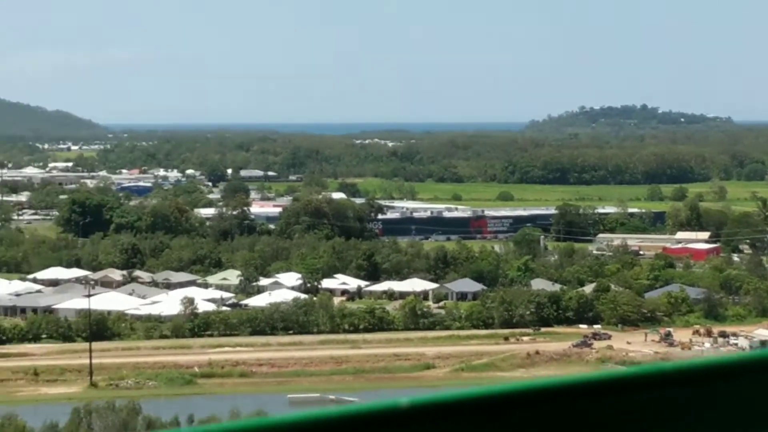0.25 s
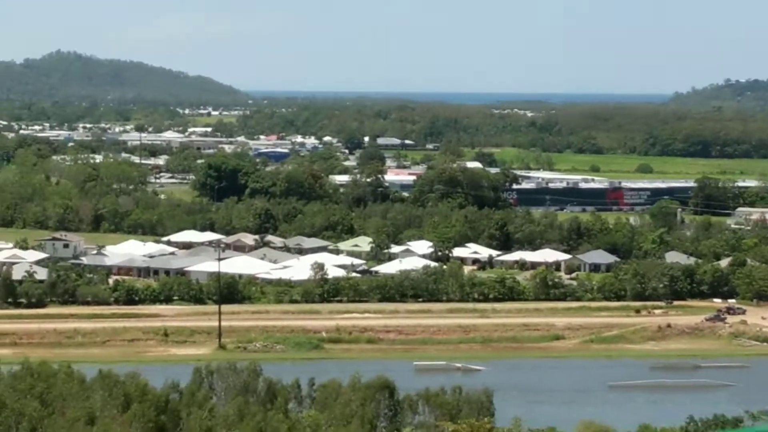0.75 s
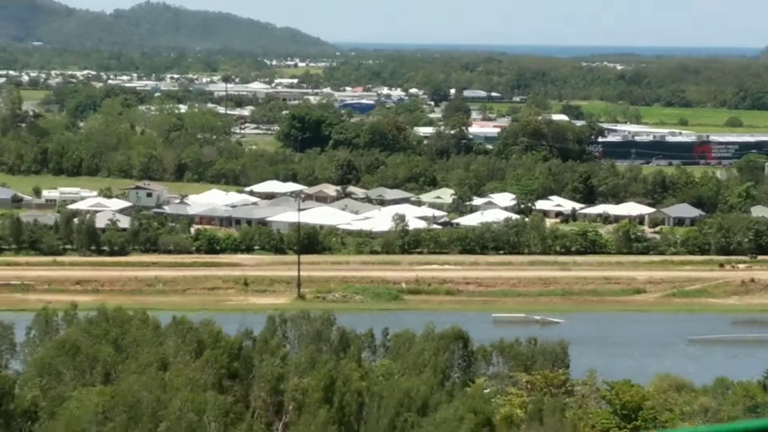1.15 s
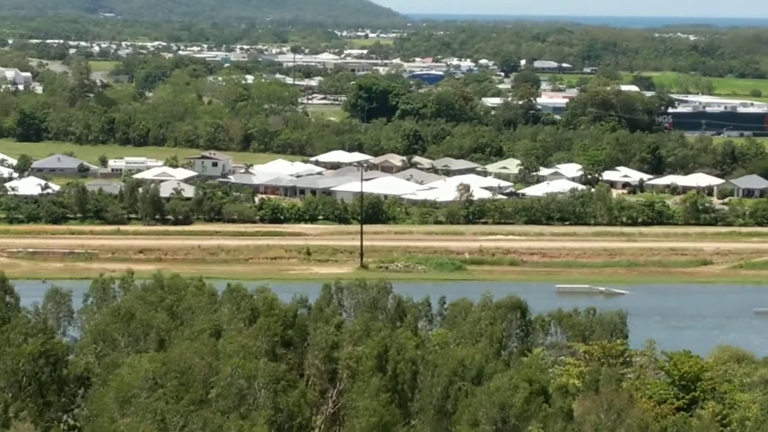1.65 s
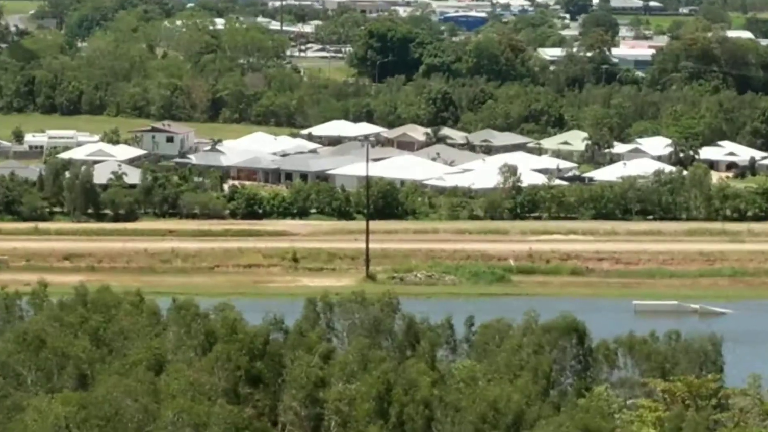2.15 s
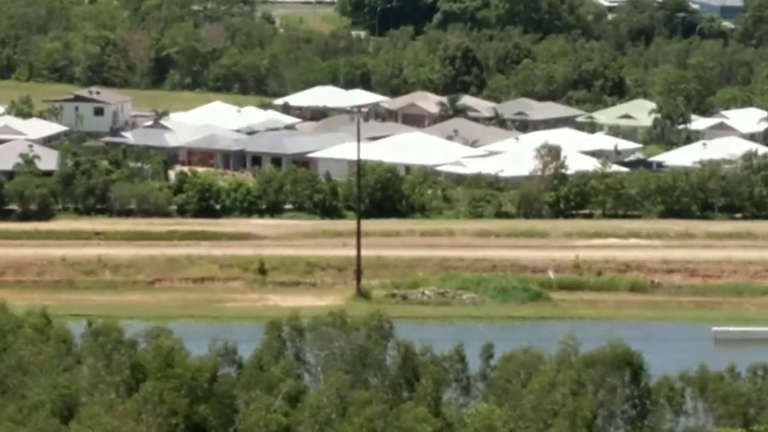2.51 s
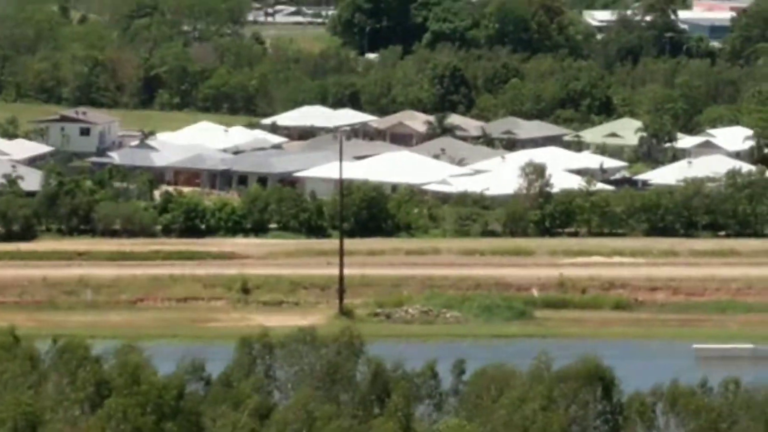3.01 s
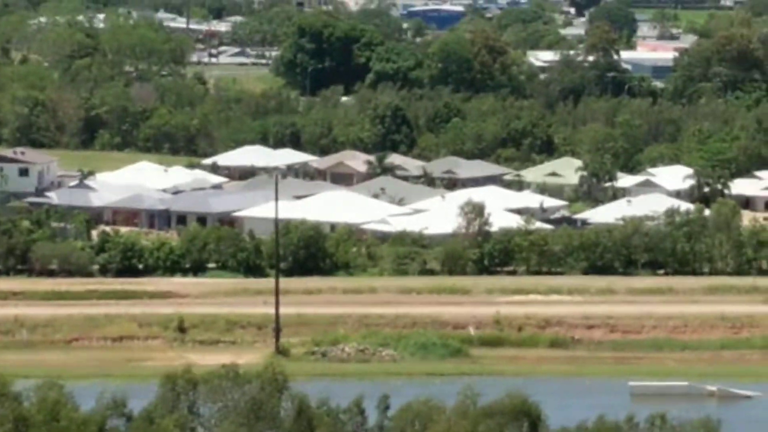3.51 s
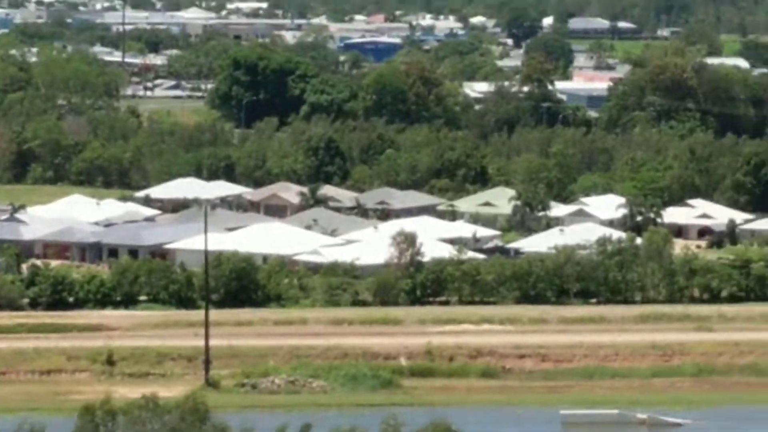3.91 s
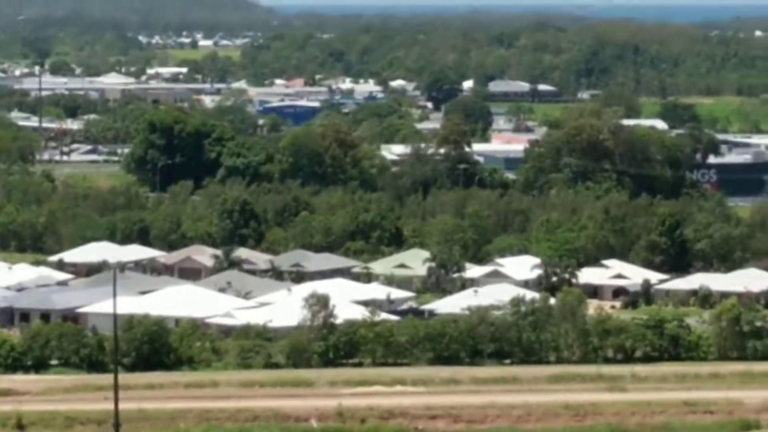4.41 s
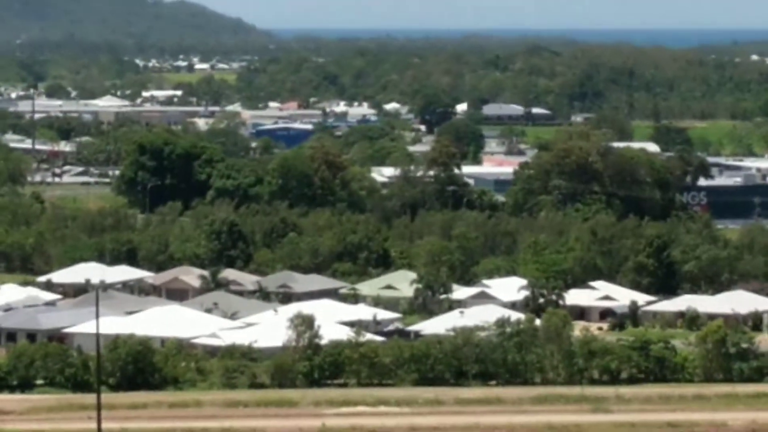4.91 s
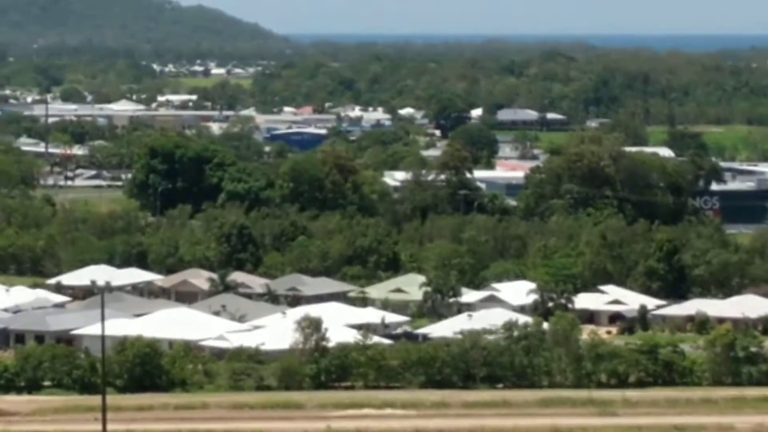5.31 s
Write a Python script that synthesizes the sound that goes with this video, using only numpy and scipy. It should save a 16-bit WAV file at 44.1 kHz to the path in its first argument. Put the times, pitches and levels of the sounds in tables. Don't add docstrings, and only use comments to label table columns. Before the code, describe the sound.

Inside a gondola cabin, a low boomy rumble continues while a loose window pane ticks, then bursts into a hard clatter at a jolt.

```python
import sys
import numpy as np
from scipy import signal
from scipy.fft import rfft, irfft
from scipy.io import wavfile
from scipy.ndimage import uniform_filter1d

SR = 44100
rng = np.random.default_rng(int(sys.argv[2]) if len(sys.argv) > 2 else 0)


def volts(x):
    e = np.asarray(x, float) / 20
    return 10 ** e


def wrap_up_sound(samples):
    columns = np.atleast_2d(samples).T
    tamed = np.clip(columns, -1, 1)
    steps = np.round(tamed * 32767).astype(np.int16)
    wavfile.write(sys.argv[1], SR, steps)


N = 244755
TIME_S = np.arange(N) / SR


def noise():
    return rng.standard_normal(N)


def level(x, db):
    return x * volts(db) / np.sqrt(np.mean(x ** 2))


def curve(points):
    return np.interp(TIME_S, *np.transpose(points))


def bump(s, half_s):
    return np.clip(1 - np.abs(TIME_S - s) / half_s, 0, 1)


def walk(rate_hz):
    hold = int(SR / rate_hz)
    x = np.repeat(rng.standard_normal(N // hold + 1), hold)
    x = uniform_filter1d(uniform_filter1d(x, hold), hold)[:N]
    return x / x.std()


def colour(x, spectrum):
    hz, db = np.transpose(spectrum)
    grid_hz = np.linspace(1, SR / 2, 4097)
    log_gain = np.interp(np.log(grid_hz), np.log(hz), db) * np.log(10) / 20
    cepstrum = irfft(log_gain)
    cepstrum[1:4096] *= 2
    cepstrum[4097:] = 0
    response = irfft(np.exp(rfft(cepstrum)))
    return signal.fftconvolve(x, response)[:N]


def resonate(x, hz, width_hz):
    b, a = signal.iirpeak(hz, hz / width_hz, fs=SR)
    return signal.lfilter(b, a, x) * np.sqrt(SR / width_hz / np.pi)


def body(x, modes):
    out = np.zeros(N)
    for k, (hz, width_hz, db) in enumerate(modes):
        out += (-1) ** k * volts(db) * resonate(x, hz, width_hz)
    return out


def steady(x, share):
    envelope = np.sqrt(uniform_filter1d(x ** 2, size=1200))
    return level(x / (envelope + 0.9 * x.std()) ** share, 0)


def train(s, db):
    x = np.zeros(N)
    np.add.at(x, np.minimum((s * SR).astype(int), N - 1), volts(db))
    return x


def fade(x, t60_s):
    return signal.lfilter([1], [1, -1000 ** (-1 / (t60_s * SR))], x)


def swells(hz):
    # time in s, mode in Hz, rise and fall in s, level in dB.
    mode_swells = [(.15, 52, 0.12, 11), (0.97, 52, .1, 3), (2.06, 52, .12, 4), (2.5, 52, 0.16, 23.5),
                   (2.82, 52, 0.15, 15), (3.12, 52, 0.21, 14.5), (3.64, 52, 0.19, 16.5), (4.08, 52, .1, 1),
                   (4.56, 52, .11, 17), (4.75, 52, 0.11, 17.5), (1.16, 79, 0.039, -5),
                   (2.22, 79, 0.13, 4.5), (2.68, 79, 0.095, 1), (3.83, 79, 0.15, -4),
                   (4.06, 79, 0.11, 11.5), (4.58, 79, 0.082, 9.5), (5.38, 79, 0.19, -0.5),
                   (1.22, 140, 0.16, -10), (3.23, 140, 0.077, -28), (3.852, 140, 0.12, 12.5),
                   (4.08, 140, 0.059, -13), (1.62, 244, 0.28, 3.5), (4.55, 140, .07, 10.5),
                   (0.91, 244, 0.14, 6.5), (2.06, 244, 0.13, 2.5), (2.16, 244, 0.058, -18),
                   (2.54, 244, 0.15, 13.5), (3.52, 244, 0.25, 7), (4.07, 244, 0.063, -26.5),
                   (4.65, 244, 0.38, 4.5), (0.42, 244, 0.092, -9), (5.1, 244, .08, -12),
                   (5.1, 140, .12, 9.5), (3.55, 79, 0.044, -13), (0.16, 79, 0.093, 3.5),
                   (0.455, 79, 0.13, 4.5), (1.3, 79, 0.098, 3.5), (2.8, 79, 0.057, 5.5), (1.1, 347, .1, 6),
                   (2.65, 347, 0.053, 8), (4.3, 347, 0.086, 9), (4.35, 347, 0.074, 8), (5.3, 347, 0.098, 7),
                   (3.67, 196, 0.063, 3), (.2, 456, .12, 8), (0.72, 602, .2, 6.5)]
    out_db = np.zeros(N)
    for s, mode_hz, half_s, db in mode_swells:
        if abs(mode_hz / hz - 1) < .1:
            out_db += db * bump(s, half_s)
    return out_db


def cabin():
    # time in s, level in dB against the calm ride.
    shaking = [(0.0, -3), (.3, -1), (1.3, -1), (2.1, 0), (2.5, 0), (2.78, 6.5), (2.95, -1), (3.05, 4),
               (3.5, 1), (4.3, -2), (4.6, 0), (5.0, -2.5), (5.55, -0.5)]
    # frequency in Hz, width in Hz.
    boom_modes = [(52, 14), (79, 17.6), (140, 15.3), (244, 5.86)]
    calm_levels_db = [-50.5, -36, -38.5, -43]
    shake_follow = [1.95, 0.9, 1.16, 1.05]
    # frequency in Hz, width in Hz, level in dB.
    panel_modes = [(194.8, 22.8, -43.5), (302.3, 38, -52), (347.4, 17.6, -50), (459, 33, -63.5),
                   (597, 15, -64)]
    # frequency in Hz, density in dB per Hz.
    wall_spectrum = [(25, -50), (50, 1.5), (100, 0.5), (270, -5.5), (400, -19), (800, -21.5), (1400, -38),
                     (3000, -52)]
    shake_db = curve(shaking)
    booms = np.zeros(N)
    for (hz, width_hz), calm_db, follow in zip(boom_modes, calm_levels_db, shake_follow):
        once = resonate(noise(), hz, 1.26 * width_hz)
        boom = steady(resonate(once, hz, 1.26 * width_hz), share=0.36)
        booms += volts(calm_db + follow * shake_db + swells(hz)) * boom
    panels = np.zeros(N)
    for hz, width_hz, db in panel_modes:
        panels += volts(db + swells(hz) + 1.4 * walk(3.31)) * resonate(noise(), hz, width_hz)
    walls = level(colour(noise(), wall_spectrum), -39)
    return booms + (panels + walls) * volts(0.71 * shake_db + 1.2 * walk(9))


def strikes():
    # time in s, peak in dB, then frame knock, brightness, tail in dB re peak.
    clatter = [(2.5138, -26, 3, -13, 1.5), (2.538, -26, 3, -25, -3), (2.574, -22.5, -6, -11, -7.5),
               (2.6128, -15.5, -11.5, -18, -13.5), (2.6165, -19, -14, -21, -14), (2.648, -41, 0, -14, -17),
               (2.676, -35, 9, -22, -6), (2.704, -22.5, -2, -31, -6), (2.73, -20.5, -11, -14, -13),
               (2.7558, -20, -14, -12, -12), (2.7759, -15, -13, -10.5, -8.5), (2.8086, -20, -5, -12, -5),
               (2.8165, -20, -16, -12, -10.5), (2.8544, -17.5, -15, -11, -14),
               (2.8951, -22, -11, -11.5, -10), (2.929, -34, -18, -16, -10), (2.965, -40, -25, -7, -3.5),
               (3.0514, -22.5, -8, -13, -10), (3.092, -16.5, -8.5, -11, -8.5),
               (3.129, -20.5, -7, -18, -10.5), (3.1325, -22, -12, -18, -13)]
    # time in s, peak in dB, frame knock and
    # tail in dB re peak, extra glass ring in dB.
    taps = [(0.07, -48, 5, -9, -1), (0.1346, -43, -11, -8, -2), (.6824, -44.5, 5.5, -7, -7),
            (0.9237, -36, -2.5, 0, -5), (1.1743, -47.5, 9.5, -9, -6), (1.265, -65, 6, -3, -1),
            (1.52, -48, 17, -0.5, -3), (1.5847, -45, 5, -8, -3), (1.8384, -37.5, 0.5, -7, 3.5),
            (1.8881, -33.5, -4, -11, -11), (2.162, -49, -5, -12, 2), (2.4753, -41, 0, 3.5, -9),
            (3.199, -55, 14, -21, -4), (3.727, -39.5, -4, -7, 2.5), (3.774, -46, 1, -12, -2),
            (4.226, -41.5, -16, -1, -19), (4.5114, -34.5, -2.5, -8, -16), (4.556, -37.5, 5.5, 3.5, -6),
            (4.63, -39, -21, -7, 0), (4.8087, -35.5, 4, -3.5, -3), (4.6545, -38, -16, -9, 1.5),
            (4.7258, -40, -12, -10, -4), (4.773, -43, -17, -5, -4), (5.003, -47, -12, -9, -9),
            (5.257, -51, -12, -12, 0), (2.652, -47, -9, -18, 5), (4.9251, -56, -10, -12, 2),
            (4.9438, -45, -12, -11, -1), (2.757, -52, -9, -15, 7), (2.799, -36, -7, -15, 10),
            (2.856, -40, -7, -15, 12), (2.896, -45, -9, -15, 8), (4.8806, -37, -3, -5.5, 1),
            (5.317, -45, -11, -5, 0), (5.447, -32, -13, -1, 2), (5.489, -52, -9, -18, 7)]
    # time in s, peak in dB, extra glass ring in dB.
    ticks = [(0.1191, -46, -3), (0.2189, -47, -4), (0.2838, -46, -4), (0.3202, -45, 0), (0.3561, -43, 1),
             (0.3815, -43, 3), (0.4693, -35, -0.5), (0.4978, -46, 3), (0.5314, -51, -2), (0.7447, -50, -4),
             (0.8739, -53, -6), (1.0236, -45, 0), (1.0595, -44, -2), (1.1348, -55, -8), (1.3374, -42.5, 0),
             (1.3753, -37, 1), (1.4247, -42, -1), (1.4636, -50, 0.5), (1.6382, -54, -6), (1.6776, -45, 1),
             (1.7055, -51, -1), (1.7394, -41, 4), (1.7799, -41, 3), (1.9265, -48, 2), (1.952, -48, -1),
             (1.9889, -38, 3), (2.0198, -52, 0), (2.0722, -50, -2), (2.3256, -48, 0), (2.3535, -35.5, 3.5),
             (2.3885, -39, 2), (3.25, -41, 2), (3.2869, -42, 2), (3.3209, -45, -1), (3.3563, -35.5, -2.5),
             (3.4042, -38, 4), (3.4401, -35, 3), (3.4775, -40, 3.5), (3.5044, -45, 1), (3.5718, -48, -2),
             (3.6057, -41, 1), (3.6446, -44, 5), (3.8357, -40.5, 0), (3.8831, -39, 1), (3.9205, -44, 4),
             (3.9624, -40, 8), (3.9923, -35, 4), (4.0307, -36.5, 6), (4.0766, -37, 0), (4.2408, -35, 0),
             (4.3041, -35.5, -1), (4.3794, -38, -2), (4.4179, -37.5, -5), (5.0684, -49, -0.5),
             (5.1048, -42, 2), (5.1417, -39, -3), (5.1806, -34, -2), (5.2175, -47, -5), (5.3797, -38.5, 1),
             (5.4191, -44, -4)]
    soft_bright_db, tick_tail_db, tick_db, clatter_ring_db = -22, -6.5, -2.5, 4
    settles_s, run_knock_db, settled_knock_db = 3.35, -4, -21.5
    rows = [(*row, clatter_ring_db) for row in clatter]
    for s, db, knock_db, tail_db, ring_db in taps:
        rows.append((s, db, knock_db, soft_bright_db, tail_db, ring_db))
    for s, db, ring_db in ticks:
        knock_db = run_knock_db if s < settles_s else settled_knock_db
        rows.append((s, db + tick_db, knock_db, soft_bright_db, tick_tail_db, ring_db))
    return np.transpose(rows)


def rattle():
    # frequency in Hz, density in dB per Hz.
    crack_spectrum = [(590, -31.5), (1000, 0.5), (1290, -8.5), (1470, -4), (2010, 0), (2640, -3.5),
                      (7720, -8.5), (9500, -49), (12400, -32), (20900, -120)]
    # frequency in Hz, width in Hz, level in dB.
    pane_modes = [(2420, 54, -10), (2910, 33, -18), (3500, 13, 12), (3900, 29, -6), (4500, 33, 5.5),
                  (5000, 28, 2), (5640, 170, 10), (6240, 37, -13), (6930, 29, 13.5), (7595, 540, 20),
                  (8350, 300, 4)]
    # frequency in Hz, width in Hz, level in dB.
    frame_modes = [(345, 24, -7), (456, 13, -3), (573, 61, 0.5), (718, 81, -3), (852, 47, -6),
                   (990, 37, -10), (1252, 81, -5.5)]
    # time in s, peak in dB.
    edge_raps = [(1.525, -20.5), (2.516, -24), (2.54, -19), (2.58, -20), (2.614, -22), (2.706, -20),
                 (2.772, -22), (2.809, -12.5), (2.816, -24), (3.092, -18), (3.13, -15), (4.557, -31),
                 (4.816, -35)]
    s, peak_db, knock_db, bright_db, tail_db, _ = strikes()

    def chatter(db, t60_s):
        hits = train(s, db)
        return fade(hits, t60_s) - fade(hits, 0.0086)

    touch = train(s, peak_db)
    blow = touch + train(np.maximum(s - .004, 0), peak_db - 5.5)
    crack = volts(3) * fade(blow, .007) * noise() + volts(7) * blow
    crack += chatter(peak_db + tail_db, 0.18) * noise() * volts(2.8 * walk(400))
    crack += volts(-4) * fade(touch, 0.017) * noise() * volts(2.8 * walk(900))

    unit = noise()
    contact = colour(crack, crack_spectrum) / colour(unit, crack_spectrum).std() * volts(-10.5)
    pane = body(crack, pane_modes) / body(unit, pane_modes).std() * volts(-18.5)

    knock = chatter(peak_db + knock_db, 0.15) * noise()
    knock += volts(17.5) * train(*np.transpose(edge_raps))
    frame = volts(-10.0) * body(knock, frame_modes)

    top_db = peak_db + bright_db
    top = (fade(train(s, top_db), 0.0088) + volts(-4.0) * chatter(top_db, 0.12)) * noise()
    top = volts(3.0) * colour(top, [(5000, -6), (8500, -6), (12000, -12.0), (16000, -22)])
    return contact + pane + frame + top


def glass():
    # frequency in Hz, level in dB, t60 in s.
    glass_modes = [(2000, 6, 0.051), (2116, 1.5, 0.024), (3460, -5, 0.021), (3600, -6, 0.04),
                   (4840, -11.5, 0.1), (7920, -31, 0.03)]
    s, peak_db, *_, extra_db = strikes()
    ring_lag_s, scatter_db = .0025, -1.8
    ring_db = -50.5 + 0.26 * (peak_db + 38.0) + extra_db
    ring_db = ring_db + scatter_db * rng.standard_normal(len(s))
    hits = train(s + ring_lag_s, ring_db) * np.sign(noise())
    hits = 0.59 * hits + np.roll(hits, int(.002 * SR))
    hits += (volts(-30) * fade(np.abs(hits), .05) + volts(-89)) * noise()
    out = np.zeros(N)
    for hz, db, t60_s in glass_modes:
        varied = hits * volts(4.0 * noise() * (hz > 2050))
        out += volts(db) * resonate(varied, hz, 2.33 / t60_s)
    return volts(10.5) * out


def bumps():
    # time in s, peak in dB, pitch in Hz, t60 in s.
    pushes = [(1.524, -14.5, 114, 0.053), (2.251, -18.5, 225, 0.069), (2.511, -22, 202.4, 0.13),
              (2.778, -13.5, 153, 0.067), (3.017, -5, 143, 0.046), (3.017, -14.5, 284, 0.032),
              (3.044, -12.5, 121, 0.08), (3.291, -6, 79.5, 0.036), (3.619, -24, 99, 0.048),
              (3.654, -17, 318, 0.044), (3.671, -10.5, 162, 0.036), (5.177, -15, 131, 0.039),
              (2.35, -14, 152, 0.026), (4.559, -32, 80, 0.051)]
    push_s = 0.0062
    out, t = np.zeros(N + SR), np.arange(SR // 4) / SR
    onset = np.sin(np.pi / 2 * np.minimum(t / push_s, 1)) ** 2
    for s, db, hz, t60_s in pushes:
        cycles = hz * (t + 0.0017 * (1 - np.exp(-t / 0.0033)))
        decay = 1000 ** (-t / max(t60_s, .01))
        out[int(s * SR):][:len(t)] += volts(db) * np.sin(2 * np.pi * cycles) * decay * onset
    return out[:N]


def hum():
    # frequency in Hz, width in Hz, level in dB.
    roller_modes = [(640, 11, -0.5), (701, 16, -1)]
    start_s, end_s, rise_s, fall_s = 1.27, 2.45, 0.3, 0.15
    gate = np.interp(TIME_S, [start_s, start_s + rise_s, end_s, end_s + fall_s], [0, 1, 1, 0])
    hum_db = -51 + 3.6 * bump(2.02, 0.21) + 1.3 * walk(14.0)
    return steady(body(noise(), roller_modes), share=0.65) * volts(hum_db) * gate


def squeaks():
    # start in s, end in s, start pitch in Hz, end pitch in Hz, level in dB.
    whistles = [
        (0.0, .07, 2330, 2330, -61),
        (.04, .12, 2330, 2320, -60),
        (.11, .19, 2320, 2300, -64),
        (3.975, 4.025, 2005, 2000, -52),
        (4.03, 4.1, 2000, 2010, -55),
        (4.238, 4.268, 2760, 2790, -54),
        (4.3, 4.41, 3170, 2940, -64),
        (3.88, 4.15, 4020, 4000, -68),
        (4.2, 4.5, 4010, 4000, -71),
        (4.82, 4.86, 7400, 7250, -61),
    ]
    out = np.zeros(N)
    for start_s, end_s, start_hz, end_hz, db in whistles:
        part = out[int(max(start_s, 0) * SR):int(end_s * SR)]
        phase = np.cumsum(np.linspace(start_hz, end_hz, len(part))) * 2 * np.pi / SR
        part += volts(db) * np.sin(phase) * np.hanning(len(part)) ** 0.24
    return out * volts(2.5 * walk(120))


def scuffs():
    # start in s, length in s, level in dB, low edge in Hz, high edge in Hz.
    scrapes = [(0.922, 0.029, -55, 1480, 11800), (1.52, 0.031, -42, 895, 3640),
               (1.529, 0.025, -38.5, 490, 890), (3.359, 0.024, -53.5, 1500, 7900),
               (3.865, 0.29, -58.5, 2530, 4530), (4.219, 0.028, -60, 4500, 11900),
               (4.51, 0.0097, -48, 1330, 1900), (4.515, 0.051, -65, 5170, 7700),
               (4.568, 0.022, -52.5, 2000, 11600), (4.82, 0.06, -63, 6350, 8150),
               (5.443, 0.026, -54.5, 1500, 12900)]
    out = np.zeros(N)
    for s, length_s, db, low_hz, high_hz in scrapes:
        times_s = [s, s + 0.0054, s + length_s, s + 2.3 * length_s]
        hold = np.interp(TIME_S, times_s, [0.001, 0.83, 0.36, 0.012])
        band = signal.butter(3, [low_hz, high_hz], "band", fs=SR, output="sos")
        out += hold * level(signal.sosfilt(band, noise()), db)
    return out * volts(3.3 * walk(300))


def air():
    # time in s, level in dB.
    wind_levels = [
        (0.0, -56),
        (0.5, -53.5),
        (1.76, -54),
        (4.34, -55.5),
        (5.1, -58),
        (5.55, -57),
    ]
    # time in s, rise and fall in s, level in dB.
    seal_gusts = [
        (2.63, 0.26, 27),
        (3.12, .2, 6),
    ]
    # frequency in Hz, density in dB per Hz.
    air_spectrum = [(600, -6.5), (1100, 14.5), (1600, 3), (2500, -8.5), (4000, -7), (6000, -9.5),
                    (8000, -6), (8900, -34), (12000, -17), (15500, -14)]
    # frequency in Hz, density in dB per Hz.
    hiss_spectrum = [(240, -35), (400, -4), (653, -2.5), (914, -13), (1000, -15), (2250, -27), (2430, -34),
                     (2970, -29), (15500, -38)]
    wind_db = curve(wind_levels)
    for s, half_s, db in seal_gusts:
        wind_db = wind_db + db * bump(s, half_s)
    vent_ends_s = 1.1
    vent = resonate(noise(), 10300, 800) * volts(-76) * np.sqrt(bump(0, vent_ends_s))
    hiss = level(colour(noise(), [(150, -60)] + hiss_spectrum), -61)
    wind = level(colour(noise(), air_spectrum), 1.6) * volts(0.62 * wind_db - 30.5 + 0.12 * walk(14))
    return vent + hiss + wind


def scene():
    mix = cabin() + rattle() + glass() + bumps() + hum() + squeaks() + scuffs() + air()
    return mix[None]


def low_pass(x):
    return signal.sosfilt(signal.butter(12, 15740, fs=SR, output="sos"), x)


def record(dry):
    bass_cut = signal.butter(6, 42, "high", fs=SR, output="sos")
    top_cut = signal.ellip(8, .2, 70, 15700, fs=SR, output="sos")
    wet = signal.sosfilt(top_cut, signal.sosfilt(bass_cut, dry))
    return low_pass(wet)


dry = scene()
out = record(dry)
wrap_up_sound(out)
```